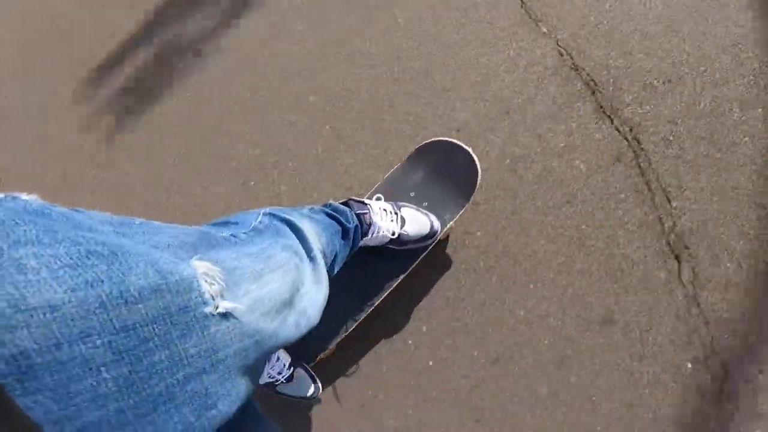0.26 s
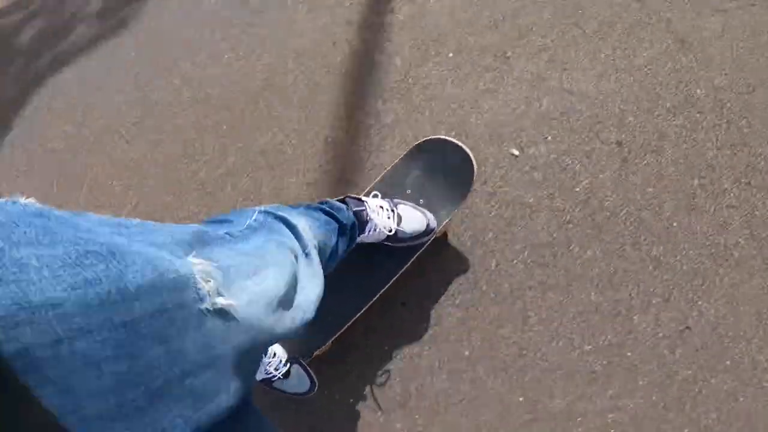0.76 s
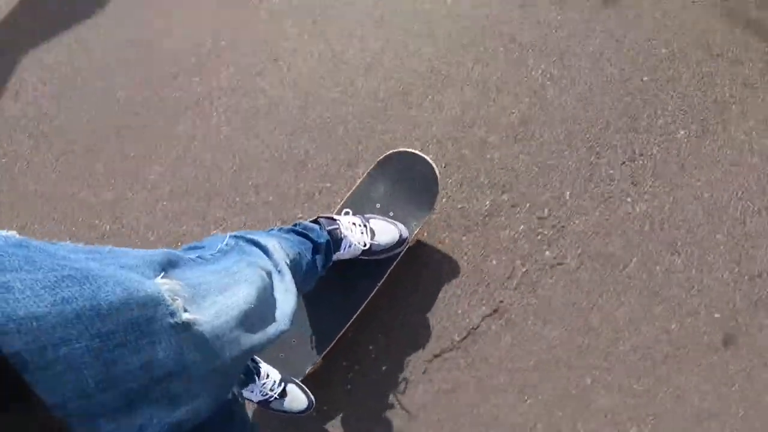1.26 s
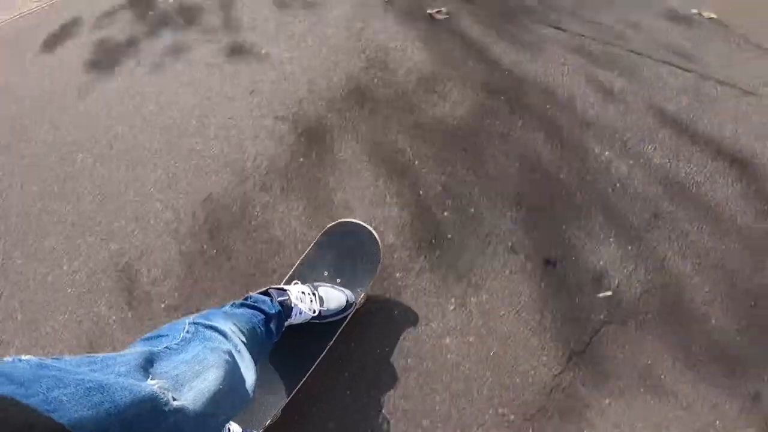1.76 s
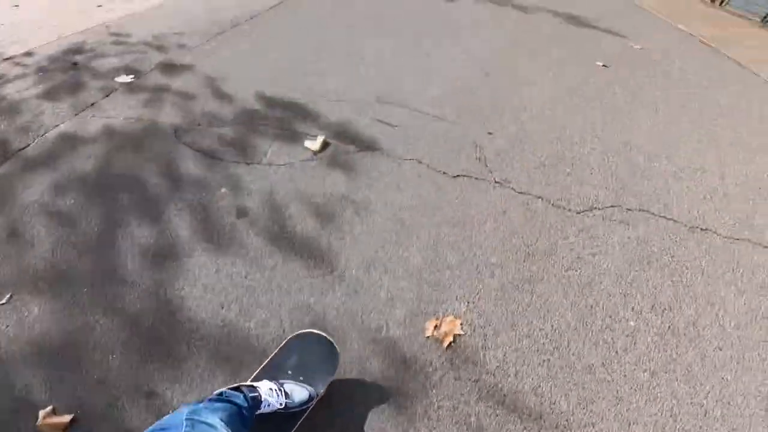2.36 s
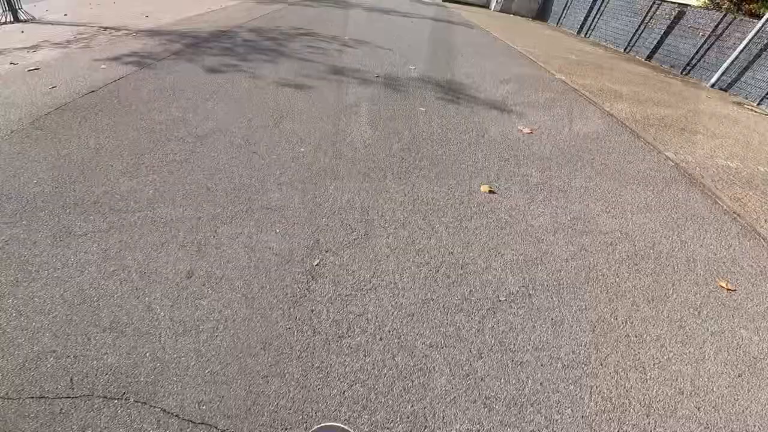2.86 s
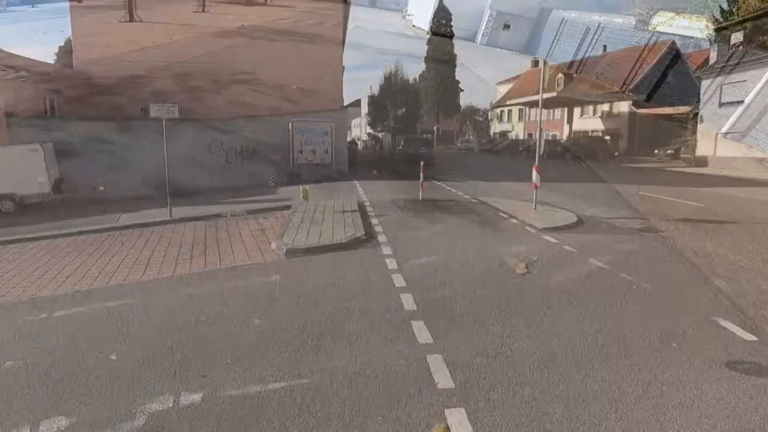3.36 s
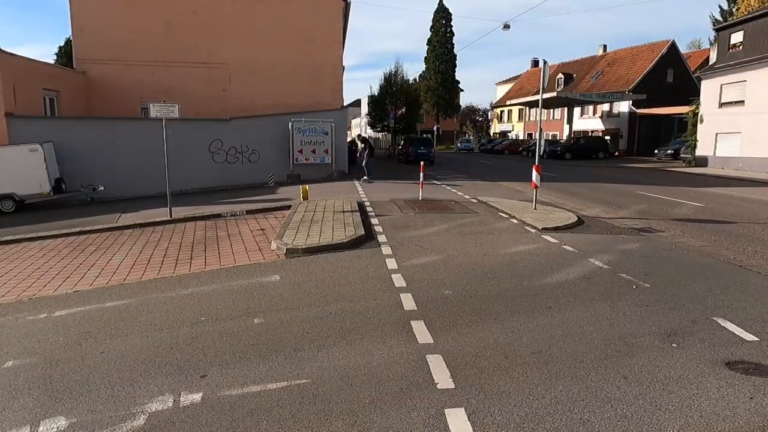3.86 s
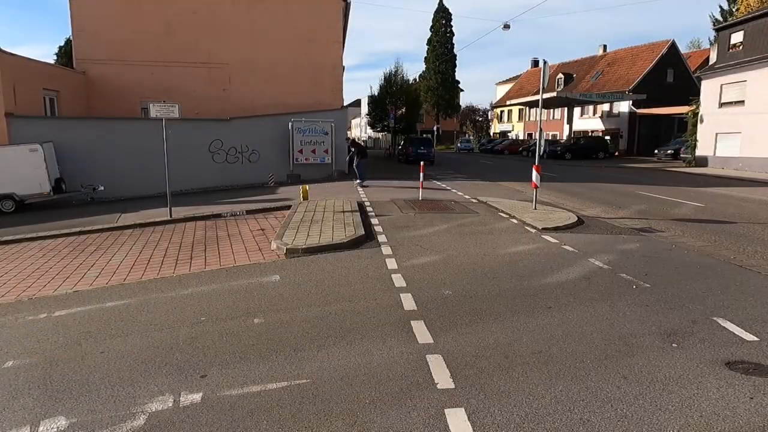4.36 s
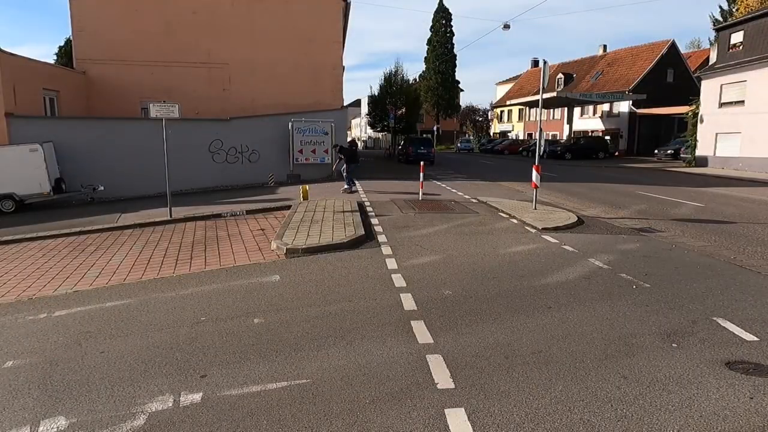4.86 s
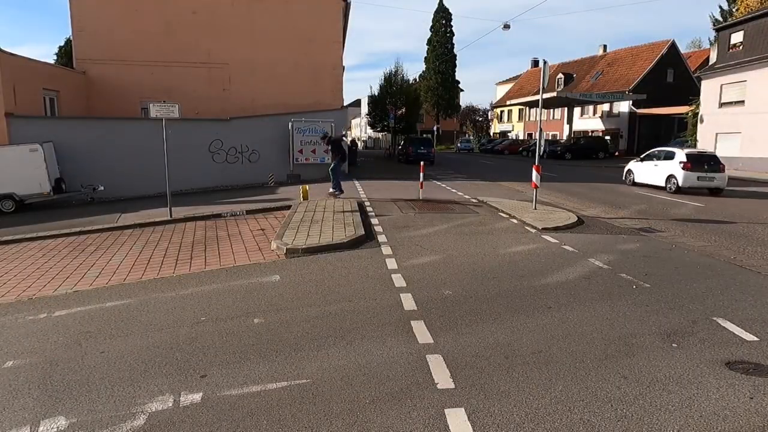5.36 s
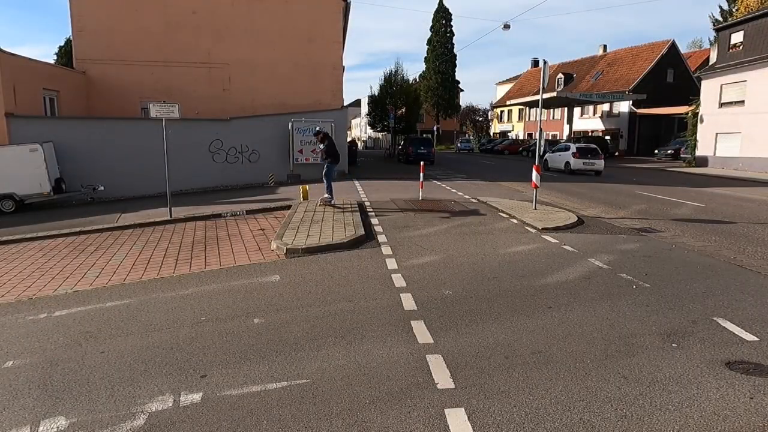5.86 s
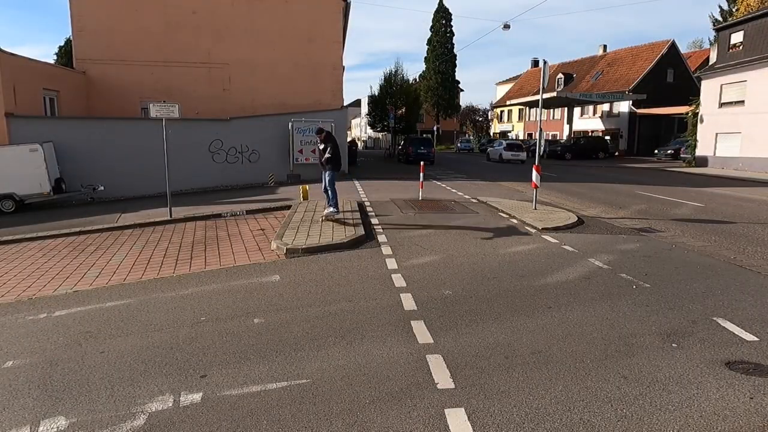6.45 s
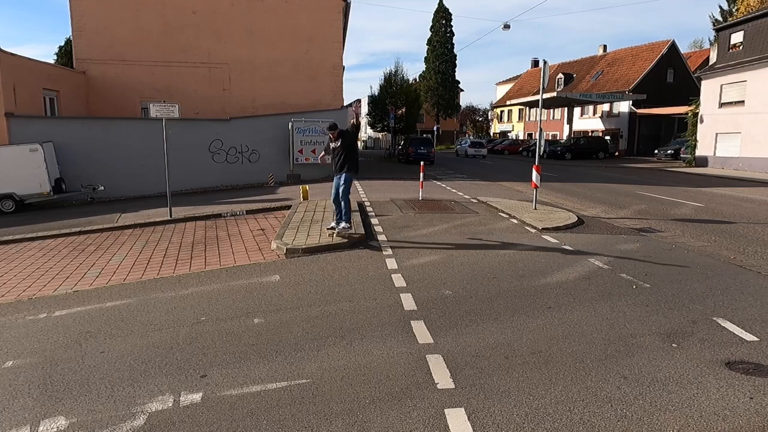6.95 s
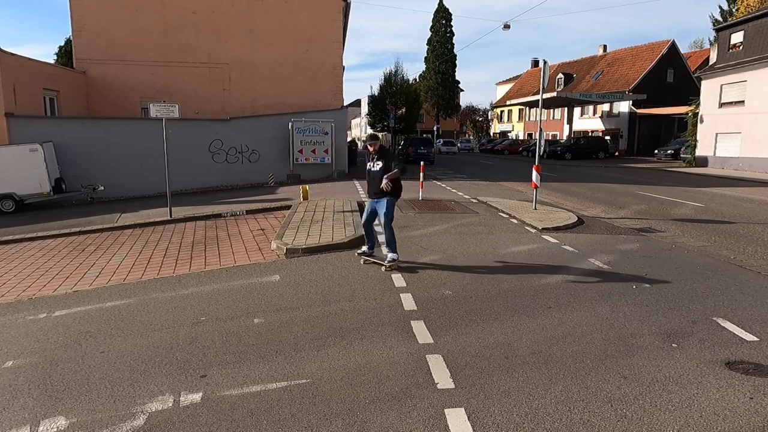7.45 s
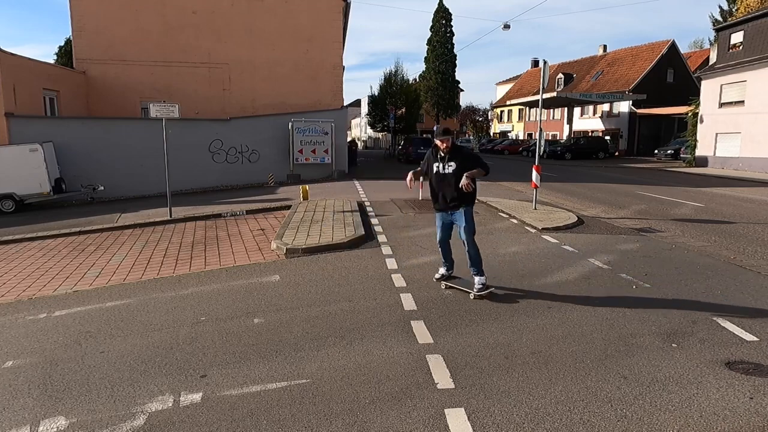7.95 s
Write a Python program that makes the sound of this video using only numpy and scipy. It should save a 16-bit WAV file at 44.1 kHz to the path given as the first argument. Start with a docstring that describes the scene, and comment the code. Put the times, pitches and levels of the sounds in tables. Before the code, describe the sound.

First a microphone near the board hears a woody, hollow rumble, gritty crunch, fine hiss and pebble clicks. Around three seconds this dissolves into a kerbside view with low air rumble, distant traffic and a passing car with humming tyres. Then a skateboard cracks at some distance, thuds down, clatters over paving blocks, drops off with the hardest clack and a short wall echo, and keeps rolling closer.

```python
"""A skateboard rolls over coarse asphalt, heard from just above the deck, and fades into a street heard from the kerb.
There a car drives past while a skater pops onto a paved traffic island, rattles over its joints,
drops off with a loud clack that a house wall throws back, and rolls closer.
Random stone contacts drive the deck, wheels and trucks; blows ring the modes of the board;
coloured noise makes tyres and wind, and a stack of harmonics makes the drone of the engines."""
import sys
import numpy as np
from scipy import signal
from scipy.fft import rfft, irfft
from scipy.io import wavfile
from scipy.ndimage import uniform_filter1d, map_coordinates

SR = 44100
rng = np.random.default_rng(int(sys.argv[2]) if len(sys.argv) > 2 else 0)


def master_out(mix):
    """Clip the mix to full scale and print it as 16-bit PCM to the path in sys.argv[1]."""
    frames = np.transpose(np.atleast_2d(mix))
    ceiling = np.clip(frames, -1, 1)
    pcm = np.round(ceiling * 32767).astype(np.int16)
    wavfile.write(sys.argv[1], SR, pcm)


N = 361619
TIME = np.arange(N) / SR


def from_db(db):
    """Turns dB into an amplitude factor."""
    return 10 ** (np.asarray(db) / 20)


def rms_one(x):
    """Scales a sound to rms 1."""
    return x / np.sqrt(np.mean(x ** 2) + 1e-20)


def levelled(x, window_s):
    """Evens a sound out: divides it by its own running level."""
    power = uniform_filter1d(x ** 2, max(int(window_s * SR), 1))
    return x / np.sqrt(power + 1e-12)


def ramp(start, end):
    """Rises in a straight line from 0 to 1 between two times."""
    return np.clip((TIME - start) / max(end - start, 1e-3), 0, 1)


def hump(middle, half):
    """A bell in time, 1 at its middle and 1/e a half length away."""
    return np.exp(-((TIME - middle) / half) ** 2)


def in_time(rows):
    """Draws each column of a curve sample by sample."""
    s, *columns = np.transpose(rows)
    return [np.interp(TIME, s, column) for column in columns]


def drift(rate):
    """Smoothed chance of spread 1, changing about `rate` times a second."""
    step = 40   # samples between the drawn points
    r = np.exp(-2 * step * np.pi * rate / SR)
    slow = signal.lfilter([1], [1, -2 * r, r * r], rng.standard_normal(N // step + 2002))
    slow = slow[2000:]   # skips the filter's start
    return np.interp(np.arange(N) / step, np.arange(len(slow)), rms_one(slow))


def response(spectrum, size=8192):
    """Causal (minimum-phase) impulse response of a spectrum, peak 1."""
    hz, db = np.transpose(spectrum)
    grid = np.maximum(np.arange(size // 2 + 1) * SR / size, 1)
    below_first_db = 20 * np.log10(np.minimum(grid / hz[0], 1))
    level_db = np.interp(np.log(grid), np.log(hz), db) + below_first_db
    # folding the cepstrum onto positive times gives minimum phase
    cepstrum = irfft(np.log(from_db(level_db)))
    cepstrum[1:size // 2] *= 2
    cepstrum[size // 2 + 1:] = 0
    h = irfft(np.exp(rfft(cepstrum)))
    return h / np.abs(h).max()


def through(x, h):
    """Sends a sound through an impulse response."""
    return signal.oaconvolve(x, h)[:N]


def coloured(x, spectrum):
    """Colours a sound by a spectrum, rms 1."""
    return rms_one(through(x, response(spectrum)))


def bandpass(x, order, band_hz):
    """Keeps one band of a sound."""
    return signal.sosfilt(signal.butter(N=order, Wn=band_hz, btype="band", fs=SR, output="sos"), x)


def shelf(x, hz, db):
    """Turns everything above a corner up or down by a changing amount."""
    low = signal.sosfiltfilt(signal.butter(N=2, Wn=hz, fs=SR, output="sos"), x)
    return low + from_db(db) * (x - low)


def burst(t60):
    """A dying puff of noise with unit energy."""
    h = rng.standard_normal(SR) * from_db(-60 * TIME[:SR] / t60)
    return h / np.sqrt(np.sum(h ** 2))


def clicks(times, db):
    """Single-sample impulses at given times and levels."""
    out = np.zeros(N)
    places = np.clip(np.round(np.asarray(times) * SR).astype(int), 0, N - 1)
    np.add.at(out, places, from_db(db))
    return out


def ring(x, hz, t60):
    """A unit click sets a sine of starting height 1 ringing."""
    r, w = np.exp(-np.log(1000) / (t60 * SR)), 2 * np.pi * hz / SR
    return signal.lfilter([0, np.sin(w)], [1, -2 * r * np.cos(w), r * r], x + 1e-18)


def resonance(x, hz, width):
    """A broad mode with gain 1 at its centre."""
    return 2 * np.pi * width / SR * ring(x, hz, np.log(1000) / (np.pi * width))


def singing(x, hz, width):
    """A resonance with steep flanks, rms 1."""
    return rms_one(resonance(resonance(x, hz, width), hz, width))


def body(x, modes):
    """Sums a set of resonances with alternating sign."""
    return sum((-1) ** k * from_db(db) * resonance(x, hz, width)
               for k, (hz, width, db) in enumerate(modes))


def scattered(x, longest, count=12):
    """A handful of short reflections from nearby surfaces ripple the spectrum."""
    size = int(longest * SR) + 2
    taps = clicks(rng.uniform(0, longest, count), np.zeros(count))[:size]
    return through(x, taps * rng.choice([-1, 1], size)) / np.sqrt(count)


def stones(per_s, spread_db):
    """Random contacts of the wheels with stones in the asphalt, a few much harder than the rest."""
    sizes = from_db(spread_db * np.minimum(rng.exponential(1, N), 4)) * rng.choice([-1, 1], N)
    return rms_one(sizes * (rng.random(N) < per_s / SR))


# Colour of the low air rumble. Each row: frequency in Hz, relative level in dB per Hz.
AIR_COLOUR = [(15, -7), (35, 6), (60, 5.5), (100, 4), (150, -0.5), (220, -19.5), (400, -26.5), (1000, -57),
              (3000, -79)]
# Low rumble at the kerb. Each row: time in seconds, level in dB.
BREEZE_LEVEL = [(3.4, -32.5), (4.2, -37.5), (4.8, -35.5), (5.7, -33.5), (6.4, -33.5), (6.9, -36),
                (7.3, -31), (7.6, -37), (8.2, -34)]
# headwind at 0 s, and its loss as the board slows
RIDE_AIR_DB, HEADWIND_LOSS_DB_PER_S = -45.5, 2


def street_air(at_kerb):
    """Lumpy low noise: headwind during the ride, breeze and town traffic at the kerb."""
    breeze_db, = in_time(BREEZE_LEVEL)
    headwind = (1 - at_kerb) * from_db(RIDE_AIR_DB - HEADWIND_LOSS_DB_PER_S * TIME)
    level = headwind + at_kerb * from_db(breeze_db)
    return level * from_db(2.0 * drift(25)) * coloured(rng.standard_normal(N), AIR_COLOUR)


# Tyres on the road, far and near. Each row: frequency in Hz, relative level in dB per Hz.
TYRE_COLOUR = [(120, -21), (200, 2.5), (300, -4.5), (390, -4.5), (500, 0), (650, -8.5), (880, -5.5),
               (1170, -7.5), (1500, -9), (2330, -16), (3800, -21.5), (5070, -34.5), (8400, -40.5),
               (11200, -54.5), (12300, -55.5), (15000, -68)]
TRAFFIC_DB = -42.5


def far_traffic():
    """The even rush of tyres in the streets around, as steady coloured noise."""
    return from_db(TRAFFIC_DB) * coloured(rng.standard_normal(N), TYRE_COLOUR)


# Engine drone: the passing car, wavering as it mixes with its reflections, then a farther engine near 64 Hz.
# Each row: time in seconds, mean firing rate in Hz, fundamental in dB, second harmonic in dB.
ENGINE_NOTE = [(3.68, 60.2, -45, -33.5), (3.85, 60.36, -25, -30), (4.05, 60.7, -28, -37),
               (4.33, 60.25, -31, -26.5), (4.55, 59.3, -28.5, -33), (4.7, 60.5, -27, -33),
               (4.8, 59.8, -27, -40), (5.08, 61.23, -28, -32.5), (5.27, 60.87, -24, -35),
               (5.55, 61.2, -28.5, -28.5), (5.78, 60.77, -30, -33), (5.95, 61.86, -32, -39),
               (6.24, 60.8, -31, -40.5), (6.42, 60.97, -50, -32.5), (6.62, 61, -36, -30.5),
               (6.8, 59.6, -43, -34.5), (6.98, 58.4, -31.5, -29), (7.2, 61, -34, -41), (7.6, 64, -37, -70),
               (7.88, 64.24, -32.5, -45), (8.2, 63.7, -36, -60)]


def engine_drone():
    """A drone of five harmonics of the firing rate, whose pitch and levels waver."""
    firing_hz, first_db, second_db = in_time(ENGINE_NOTE)
    phase = 2 * np.pi * np.cumsum(firing_hz * (1 + 0.00592 * drift(3.6))) / SR
    orders = [(1, first_db), (2, second_db), (3, first_db - 18), (4, second_db - 15), (5, first_db - 19)]
    return sum(np.sqrt(2) * from_db(db + drift(6)) * np.sin(k * phase) for k, db in orders)


# the car drives by at a steady speed
CAR_NEAREST_S, CAR_DISTANCE_M, CAR_M_PER_S = 4.923, 8.9, 17.6


def nearness_db(lag_s):
    """Level of the passing car against its nearest point, by the inverse distance."""
    along_m = CAR_M_PER_S * (TIME - CAR_NEAREST_S - lag_s)
    return 20 * np.log10(CAR_DISTANCE_M / np.hypot(CAR_DISTANCE_M, along_m))


# Howl of the tread, each resonance beamed its own way. Each row: frequency in Hz, width in Hz,
# top level in dB, moment it is loudest in seconds after the car is nearest.
TREAD_HOWL = [(1144, 170, -43.5, -0.45), (1105, 97, -41, -0.13), (1210, 125, -38.5, 0.27),
              (1520, 540, -44, -0.0046)]
# rush when nearest; dB of howl for each dB of nearness
TYRE_DB, TREAD_FOLLOWS = -34.5, 5.7


def car_tyres():
    """The rush of the passing tyres falls with distance, the tread howl fastest."""
    rush_level = from_db(TYRE_DB + nearness_db(0) + 0.63 * drift(12))
    rush = rush_level * coloured(rng.standard_normal(N), TYRE_COLOUR)
    howl = np.zeros(N)
    for hz, width, db, lag_s in TREAD_HOWL:
        level = from_db(db + TREAD_FOLLOWS * nearness_db(lag_s) + 1.6 * drift(5.8))
        howl += level * singing(rng.standard_normal(N), hz, width)
    return rush + howl


# Rough and smooth patches in the asphalt.
# Each row: middle in seconds, half length in seconds, added roughness in dB.
ROUGH_PATCHES = [(0.517, 0.11, 5), (1.124, 0.023, 4), (1.444, 0.032, -3.5), (1.796, 0.041, 2.5),
                 (2.01, 0.048, 5.5), (2.297, 0.086, 5), (2.83, 0.053, -3), (3.197, 0.13, 0.5)]
# the asphalt turns smoother between two times, by this much roughness
SMOOTH_FROM_S, SMOOTH_DB = (2.42, 2.8), -8


def asphalt():
    """Roughness in dB: the change to smoother asphalt, and the short rough or smooth patches."""
    patch_db = sum(db * hump(s, half) for s, half, db in ROUGH_PATCHES)
    return SMOOTH_DB * ramp(*SMOOTH_FROM_S), patch_db


# Resonances of the rolling, loaded deck. Each row: frequency in Hz before the sway, width in Hz,
# relative level at 0 s in dB, change as the board slows in dB per second.
DECK_MODES = [(169, 53, -6, -0.26), (219.2, 31.7, 0.5, -0.2), (279.4, 39, 0, -0.75),
              (330, 95.5, -0.5, -0.04), (416.3, 92.6, -1.5, 0.5), (488, 65, -2, -0.3),
              (573, 40, 1.4, -1.25), (637, 58, -2.2, -0.87), (753, 120, -6, 0.24)]
MODE_SWELL_DB = 0.67   # each mode swells on its own


def deck(x, band_hz=(140, 860)):
    """The loaded deck booms in broad, swelling resonances; soft wheels keep the treble out of it."""
    modes = np.zeros(N)
    for k, (hz, width, db, db_per_s) in enumerate(DECK_MODES):
        level = from_db(db + db_per_s * TIME + MODE_SWELL_DB * drift(2.45))
        modes += (-1) ** k * level * resonance(x, hz, width)
    return bandpass(modes, 4, band_hz)


# the deck's pitch sags as the board slows and sways with the rider's weight (shares)
DECK_SAG_PER_S, DECK_SWAY = .01, .015


def swayed(x):
    """Bends the deck's pitch by playing it at a slowly sagging, wandering speed."""
    speed = 1 - DECK_SAG_PER_S * TIME + DECK_SWAY * drift(2.484)
    return map_coordinates(x, [np.cumsum(speed)], order=3, mode="mirror")


# starting level, its extra loss as the board slows, and the share of the surface change it follows
BOOM_DB, BOOM_LOSS_DB_PER_S, BOOM_FOLLOWS = -16, 0.83, 0.16


def deck_boom(surface_db, patches):
    """Stones shake the deck into an evened-out boom that bends in pitch."""
    shaking = deck(stones(per_s=3400, spread_db=0.84) * from_db(0.16 * patches))
    level = from_db(BOOM_DB - BOOM_LOSS_DB_PER_S * TIME + BOOM_FOLLOWS * surface_db)
    return level * levelled(swayed(shaking), window_s=0.082)


# Wheels on grit. Each row: frequency in Hz, relative level in dB per Hz.
GRIT_COLOUR = [(400, -13), (800, 1), (1000, 1.5), (1300, -3), (1680, -6.5), (1850, -14.5), (2020, -21),
               (2400, -18.5), (2680, -25), (3800, -32.5), (5500, -42.5), (9000, -74)]
# level; share of roughness followed by all of it, and extra share above the corner
GRIT_DB, GRIT_FOLLOWS, GRIT_TOP_FOLLOWS, CRUNCH_HZ = -30.5, 0.57, 0.5, 1150


def grit_crunch(contacts, rough_db):
    """Stones crunch under the wheels, following the roughness most in the treble."""
    crunch = shelf(coloured(contacts, GRIT_COLOUR), CRUNCH_HZ, GRIT_TOP_FOLLOWS * rough_db)
    return from_db(GRIT_DB + GRIT_FOLLOWS * rough_db) * crunch


# Snapping grains. Each row: frequency in Hz, relative level in dB per Hz.
SNAP_COLOUR = [(1000, -10), (1600, -2.5), (2800, 1), (4000, -10), (5500, -6), (7500, -18.5), (12000, -49)]
SNAPS_PER_S, SNAP_SPREAD_DB, SNAP_DB = 130, 1.3, -57.5


def loose_grit(rough_db):
    """Single grains snap under the wheels as tiny noise bursts, harder in the rough patches."""
    snaps = through(stones(SNAPS_PER_S, SNAP_SPREAD_DB), burst(0.016))
    return from_db(SNAP_DB + rough_db) * coloured(snaps, SNAP_COLOUR)


# Ringing of trucks and bearings underfoot. Each row: frequency in Hz, width in Hz, relative level in dB.
TRUCK_MODES = [(2374, 95, 12), (3090, 32, -12), (3440, 47, -16), (4970, 400, -1.5), (6260, 290, -3.5),
               (7000, 210, -13.5), (7880, 370, -14.5)]
# Bearings singing whatever the surface. Each row: frequency in Hz, width in Hz, relative level in dB.
BEARING_MODES = [(2210, 70, 3.5), (2405, 65, -4.5), (7050, 590, -16.5), (8380, 410, -21.5)]
TRUCK_DB, TRUCK_FOLLOWS, BEARING_DB = -61.5, 0.37, -58


def trucks_and_bearings(contacts, rough_db):
    """Stones ring the metal of the trucks; the bearings flutter on contacts of their own."""
    metal = from_db(TRUCK_DB + TRUCK_FOLLOWS * rough_db) * rms_one(body(contacts, TRUCK_MODES))
    turning = body(stones(per_s=2500, spread_db=4.5), BEARING_MODES)
    return metal + from_db(BEARING_DB + 2.4 * drift(13)) * rms_one(turning)


# Fine hiss of the wheels. Each row: frequency in Hz, relative level in dB per Hz.
HISS_COLOUR = [(1500, -24.5), (3500, 8.5), (5200, 1.5), (6200, -5.5), (7400, -8), (8800, -15), (10000, -19),
               (11200, -32), (12300, -21), (15500, -35)]
HISS_DB, HISS_FOLLOWS = -55.5, 0.77


def wheel_hiss(contacts, patches, rough_db):
    """Stone contacts and a rub of noise make the fine top of the rolling."""
    rubbing = 1.2 * rng.standard_normal(N) * from_db(1.4 * patches)
    return from_db(HISS_DB + HISS_FOLLOWS * rough_db) * coloured(contacts + rubbing, HISS_COLOUR)


# Cracks and pebbles under the wheels, with swells of the deck boom among them (.947 and 1.426 s);
# the last row is a foot set down with a shoe scrape.
# Each row: time in seconds, relative tick level in dB, relative bump level in dB.
TICKS_AND_BUMPS = [(.093, -32, -13), (0.185, -37, -25), (.297, -39, -16), (.414, -38, -27),
                   (.462, -34, -14), (.595, -42, -8), (.66, -32, -16), (.69, -29.5, -16), (.811, -34, -26),
                   (.864, -36, -17), (.947, -45, -9.5), (1.053, -35, -20), (1.205, -30.5, -29),
                   (1.414, -38, -25), (1.426, -40, -13), (1.563, -32, -25), (1.66, -37, -30),
                   (1.791, -28, -13), (1.804, -33, -30), (2.074, -30, -8), (2.247, -34, -29),
                   (2.283, -27.5, -30), (2.327, -31, -29), (2.361, -40, -19), (2.403, -31, -8.5),
                   (2.455, -31, -28), (2.499, -28, -31), (2.607, -37, -14), (2.737, -38, -26),
                   (2.807, -50, -12), (2.9, -35, -26), (3.159, -39, -17.5), (3.269, -37.5, -20),
                   (3.44, -31.5, -27), (3.584, -36, -21)]


def ticks_and_bumps():
    """Each row excites a short puff of noise and a bump of the deck, in its own balance."""
    s, tick_db, bump_db = np.transpose(TICKS_AND_BUMPS)
    ticks = through(clicks(s, tick_db + 11.5), burst(0.029))
    unit_bump = np.abs(deck(clicks([0], [0]))).max()
    return ticks, deck(clicks(s, bump_db)) / unit_bump


SLOWING_DB_PER_S = 0.27    # loss of the rolling as the board slows
RIDE_FADE_S = (2.98, 3.906)   # the rolling fades out: start, end


def board_underfoot():
    """Boom, crunch, trucks and hiss follow the surface; the bearings and single ticks and bumps do not."""
    surface_db, patch_db = asphalt()
    rough_db = surface_db + patch_db
    level = from_db(-SLOWING_DB_PER_S * TIME) * (1 - ramp(*RIDE_FADE_S))
    patches = drift(38)   # fine unevenness of the surface
    contacts = stones(per_s=3000, spread_db=1.5) * from_db(1.7 * patches)
    rolling = deck_boom(surface_db, patches) + grit_crunch(contacts, rough_db)
    rolling += trucks_and_bearings(contacts, rough_db) + loose_grit(rough_db)
    ticks, bumps = ticks_and_bumps()
    treble = level * wheel_hiss(contacts, patches, rough_db)
    treble += 0.23 * through(ticks, response(HISS_COLOUR))
    off_the_ground = .25 * scattered(treble, longest=.004)
    return level * rolling + bumps + through(ticks, response(GRIT_COLOUR)) + treble + off_the_ground


# the skater lands on the paving and later leaves it with his front wheels
ISLAND_START_S, ISLAND_END_S = 5.734, 7.24
# the wheels chatter on landing, and once on the road before it, then settle
CHATTERS_S, CHATTER_DB, SETTLE_S = (ISLAND_START_S, 4.7), 3, 0.07
# wheel level at 0 s on asphalt, and its rise as he nears
ROLL_DB, NEARING_DB_PER_S = -46.5, 0.98
# extra on the paving, and its spread from one block to the next
PAVING_DB, BLOCKS_DB = 4.5, 1.3
# the rolling dips briefly on the paving
DIP_S, DIP_HALF_S, DIP_DB = 7, 0.021, -9


def rolling_db():
    """The wheels grow as the skater nears, roar unevenly on the paving, and chatter and dip."""
    on_island = (TIME > ISLAND_START_S) & (TIME < ISLAND_END_S)
    paving_db = (PAVING_DB + BLOCKS_DB * drift(10)) * on_island
    chatter = sum((TIME >= s) * np.exp(-np.abs(TIME - s) / SETTLE_S) for s in CHATTERS_S)
    dip_db = DIP_DB * hump(DIP_S, DIP_HALF_S)
    return ROLL_DB + NEARING_DB_PER_S * TIME + paving_db + CHATTER_DB * chatter + dip_db


# The skater's wheels at a distance. Each row: frequency in Hz, relative level in dB per Hz.
FAR_WHEEL_COLOUR = [(90, -18), (190, 7.5), (290, -2.5), (400, -14.5), (550, 2), (640, -4.5), (740, 0.5),
                    (930, -8.5), (1100, -5), (1330, -10), (1650, -11.5), (2100, -12.5), (2500, -22.5),
                    (4000, -27), (5600, -33), (7000, -34), (11000, -52.5), (15000, -68)]
BUMPY_DB = 2   # spread of the quick unevenness
WHIRR_HZ, WHIRR_WIDTH_HZ, WHIRR_DB = 1320, 260, -53.5   # level at 0 s


def far_rolling():
    """Stone contacts roar through the wheels and sing in the bearings; a whirr stays on any surface."""
    contacts = stones(per_s=3000, spread_db=1.0)
    force = from_db(rolling_db() + BUMPY_DB * drift(52))
    roll = force * coloured(contacts, FAR_WHEEL_COLOUR)
    bearings = from_db(-44.5) * force * singing(contacts, hz=6800, width=230)
    whirring = singing(stones(per_s=3900, spread_db=8.0), WHIRR_HZ, WHIRR_WIDTH_HZ)
    return roll + bearings + from_db(WHIRR_DB + NEARING_DB_PER_S * TIME) * whirring


# Scrapes of wheels and shoe soles. Each row: start in seconds, nominal length in seconds, level in dB.
SCRAPES = [(3.582, 0.023, -28.5), (5.592, 0.069, -36.5), (5.727, 0.085, -38), (7.174, 0.06, -41.5),
           (8.132, 0.056, -33.5)]
# Colour of the scrapes. Each row: frequency in Hz, relative level in dB per Hz.
SCRAPE_COLOUR = [(600, 14), (1500, 7), (3800, -6), (6500, -18.5), (9000, -26.5), (15000, -59)]


def skids():
    """Gritty scrapes start sharply and ease off, over a faint trace that stays before and after."""
    level = np.zeros(N)
    for s, length, db in SCRAPES:
        corners_s = [s, s + 0.0032, s + 0.36 * length, s + 1.9 * length]
        level += from_db(db) * np.interp(TIME, corners_s, [0.099, 0.68, 0.88, 0.046])
    return level * coloured(stones(per_s=3400, spread_db=3.0), SCRAPE_COLOUR)


# Modes of the struck board. Each row: frequency in Hz, full ring time (t60) in seconds,
# relative level in dB struck through the wheels, relative level in dB struck at the tail.
BOARD_MODES = [(123.7, 0.24, -9.5, -15), (170, 0.13, -5, -33), (247, 0.11, -5.5, -15),
               (430, 0.051, -11.5, -16.5), (529, 0.07, -31, 2), (590, 0.08, -9.5, -27),
               (622, 0.061, 1.5, -48), (731, 0.11, -20, -2.5), (1142, 0.021, -2, -20),
               (1160, .04, -14.5, -10.5), (1564, .03, -25, -9), (1690, .04, -22, -9),
               (1875.5, 0.047, -18, -3), (1906, 0.037, -22, -6.5), (2416, 0.032, -21, -7.5),
               (2896, .015, -25, -42), (3140, 0.047, -12, -35), (3850, .024, -39, -22),
               (4560, .026, -26.5, -44), (7010, 0.092, -28, -35)]
# Hard edge of a blow. Each row: frequency in Hz, relative level in dB per Hz.
CRACK_COLOUR = [(330, 1), (650, 2), (930, 1), (1300, 7), (2600, 9.5), (4500, 1), (7500, -8), (10000, -27),
                (13000, -48), (16000, -68)]
STANCE_DETUNE = .004   # spread of each mode from blow to blow with the rider's stance (share)
# the modes radiate little deep bass, and the contact is too soft for the top
RADIATED_HZ = (75, 5200)


def board_hits(times, crack_db, thud_db, on_tail, ring_share=1, split_hz=1050):
    """The rider's weight drives the low modes, bare wood and metal the high; contact point sets the balance."""
    on_tail = np.clip(on_tail, 0, 1)
    edge = through(through(clicks(times, crack_db), burst(0.05)), response(CRACK_COLOUR))
    out = np.zeros(N)
    hz, t60, wheel_db, tail_db = np.transpose(BOARD_MODES)
    chance = rng.standard_normal((len(times), 2, len(hz)))
    for s, crack, thud, tail, (luck_db, stance) in zip(times, crack_db, thud_db, on_tail, chance):
        contact_db = wheel_db + tail * (tail_db - wheel_db)
        force = from_db(np.where(hz < split_hz, thud, crack) + contact_db + luck_db)
        start = min(int(round(s * SR)), N)
        t = TIME[:min(SR // 4, N - start), None]
        decay = np.exp(-np.log(1000) * t / (t60 * ring_share))
        modes = decay * np.sin(2 * np.pi * hz * (1 + STANCE_DETUNE * stance) * t)
        out[start:start + len(t)] += modes @ force
    return edge + bandpass(out, 2, RADIATED_HZ)


# Widest paving joints. Each row: time in seconds, relative thud in dB, relative crack in dB.
WIDE_JOINTS = [(5.918, -26.5, -40), (5.931, -26, -37), (6.007, -22.5, -38), (6.036, -31, -40),
               (6.072, -25, -42), (6.102, -23, -42), (6.151, -28, -38), (6.207, -26, -41),
               (6.245, -28, -39), (6.295, -22.5, -36), (6.354, -24, -41), (6.417, -23, -43),
               (6.457, -28, -44), (6.487, -24, -36), (6.522, -27, -33), (6.58, -23.5, -35),
               (6.604, -25, -42), (6.64, -28, -39), (6.706, -24.5, -41), (6.77, -27, -41),
               (6.847, -25, -39), (6.88, -26, -40), (6.907, -29, -40), (6.95, -33, -41),
               (6.978, -23.5, -40), (7.02, -24, -36), (7.046, -26, -38), (7.127, -26.5, -39),
               (7.188, -22.5, -35), (7.221, -28, -38)]
# added to every joint; middle contact point (0 wheels to 1 tail); share of the board's full ring time
JOINT_CRACK_DB, JOINT_THUD_DB, JOINT_CONTACT, JOINT_RING = 2, 5, 0.41, 0.66
# narrow joints: rate, middle level before the additions, and largest departure from it
SMALL_JOINTS_PER_S, SMALL_JOINT_DB, JOINT_SPREAD_DB = 12, -33.5, 5


def paving_knocks(count=40):
    """Wide joints knock on the loaded deck, each a little differently; narrow ones patter between them."""
    chance = rng.random((count, 2))
    small_s = ISLAND_START_S + np.cumsum(.5 + chance[:, 0]) / SMALL_JOINTS_PER_S
    small_db = SMALL_JOINT_DB + JOINT_SPREAD_DB * (2 * chance[:, 1] - 1)
    small = np.column_stack([small_s, small_db, small_db - 5])[small_s < ISLAND_END_S]
    s, thud_db, crack_db = np.vstack([WIDE_JOINTS, small]).T
    contact = JOINT_CONTACT + rng.uniform(-0.19, 0.14, len(WIDE_JOINTS) + count)[:len(s)]
    return board_hits(s, crack_db + JOINT_CRACK_DB, thud_db + JOINT_THUD_DB, contact, JOINT_RING)


# The house wall's echo. Each row: time in seconds, echo delay in seconds, level in dB.
WALL_ECHO = [(5.62, .038, -11), (6.2, 0.055, -5), (7.45, 0.073, -10)]


def off_the_walls(hits):
    """A blurred slap from the house wall, ever later as the skater leaves it, and the street's faint tail."""
    delay, slap_db = in_time(WALL_ECHO)
    slap = through(from_db(slap_db) * np.interp(TIME - delay, TIME, hits), burst(0.12))
    tail = from_db(-17) * through(hits, burst(0.25))
    return bandpass(slap + tail, 1, [450, 1900])


# Tail pop, landings and bounces. Each row: time in seconds, crack of wood in dB,
# thud of the rider's weight in dB, contact point from 0 at the wheels to 1 at the tail.
BOARD_BLOWS = [(5.5678, -16.5, -35, 0.97), (5.57395, -14, -23, .65), (5.5798, -20, -41, 1),
               (5.731, -26, -13.5, .35), (5.742, -24, -19.5, 0.75), (5.7629, -39, -10, 0.43),
               (5.77715, -41, -20, 0.37), (5.7946, -40, -21, 0.17), (5.8122, -38.5, -23, 0.36),
               (5.8255, -37, -35, .35), (5.845, -30, -22, 0.44), (5.87206, -36, -20, 0.43),
               (7.3605, -13, -17, 0.41), (7.3639, -18.5, -9, 0.07), (7.3738, -14, -14, 0.62),
               (7.37703, -26, -21, .62), (8.142, -26, -42, .1)]


def skater():
    """Rolling, jumps, paving joints and scrapes; all but the rolling come back off the walls."""
    rolling = far_rolling()
    hits = board_hits(*np.transpose(BOARD_BLOWS)) + paving_knocks() + skids()
    return rolling + hits + off_the_walls(hits)


STREET_FADE_S = (2.6, 4.2)   # the street fades in: start, end


def scene():
    """The ride gives way to the street."""
    at_kerb = ramp(*STREET_FADE_S)
    traffic = far_traffic() + engine_drone() + car_tyres()
    street = at_kerb ** 2 * traffic + at_kerb * skater()
    return (board_underfoot() + street + street_air(at_kerb))[None, :]


CUTOFF_HZ = 15650


def record(dry):
    """Cuts the top steeply with an elliptic low-pass."""
    return signal.sosfilt(signal.ellip(10, .1, 90, CUTOFF_HZ, fs=SR, output="sos"), dry)


dry = scene()
out = record(dry)
master_out(out)
```